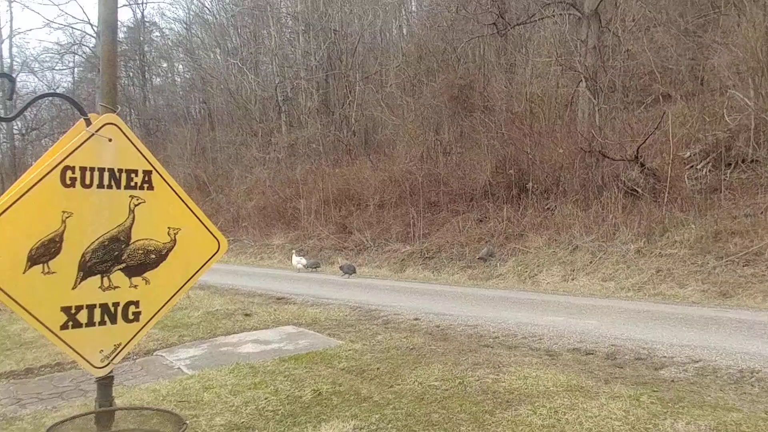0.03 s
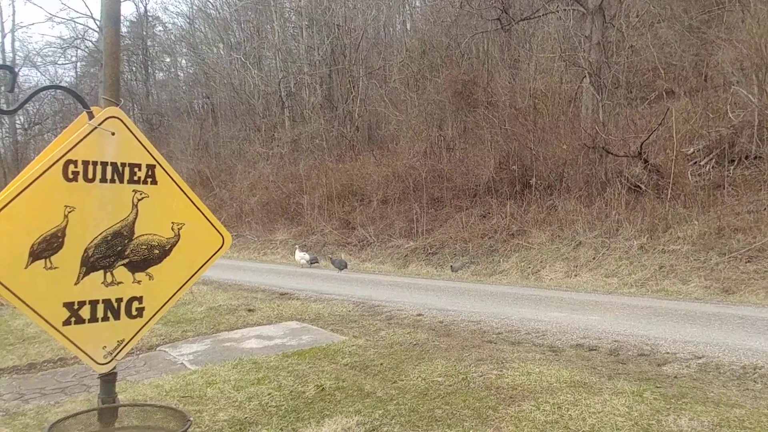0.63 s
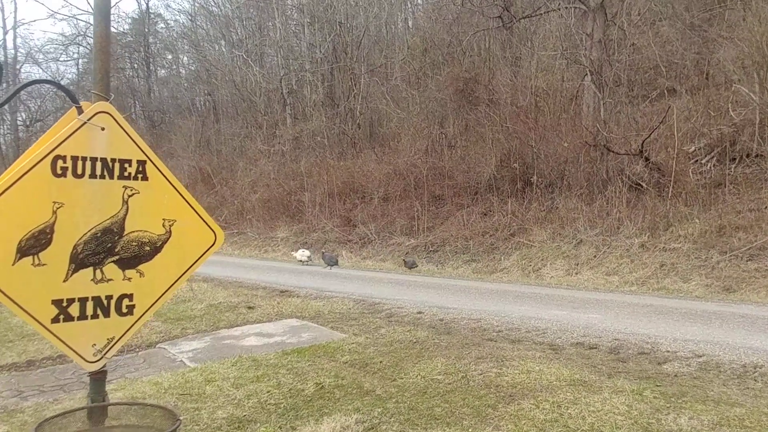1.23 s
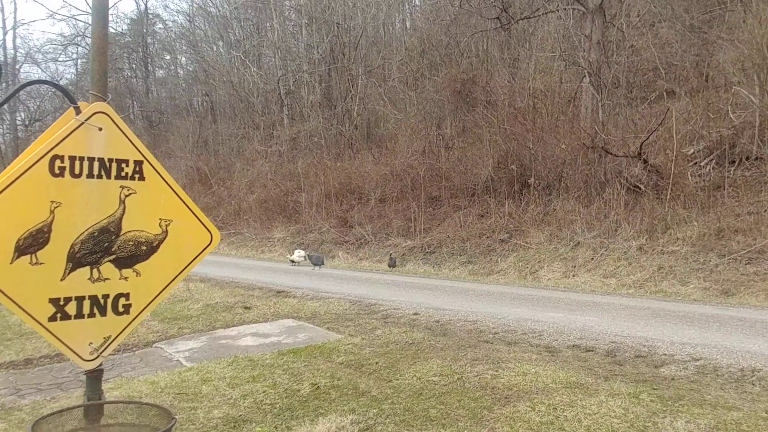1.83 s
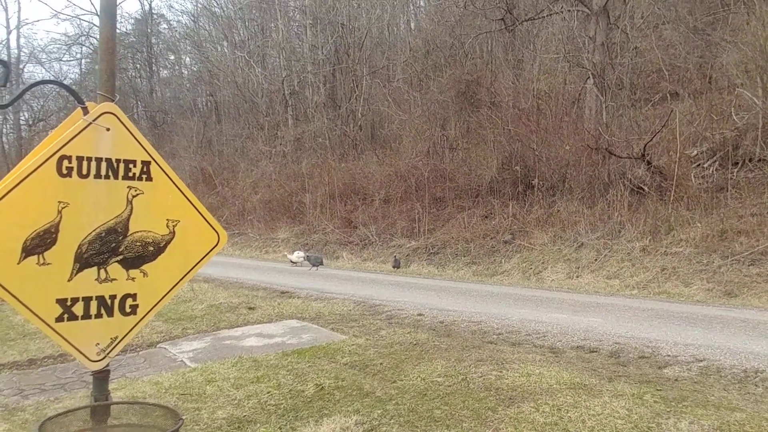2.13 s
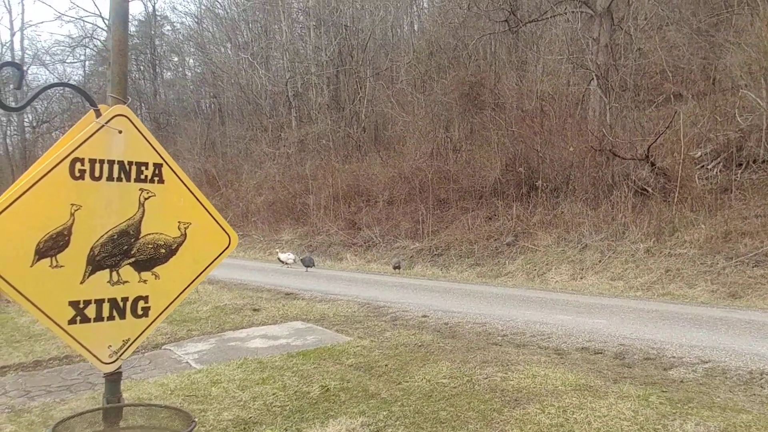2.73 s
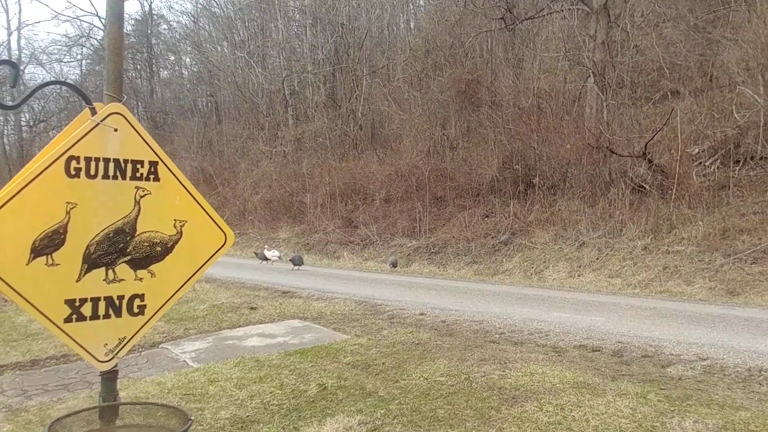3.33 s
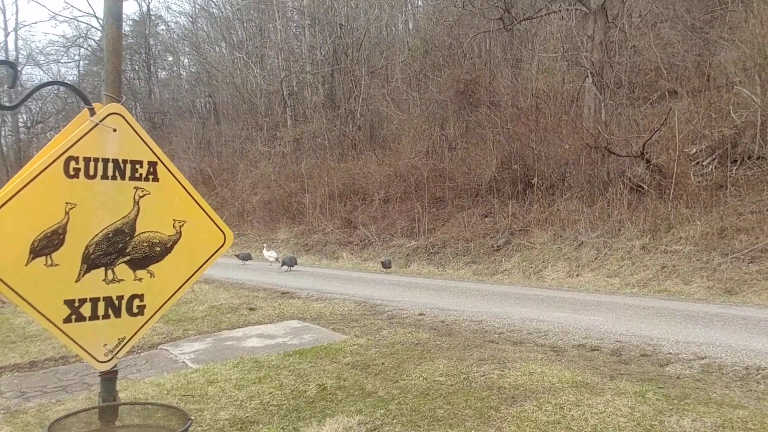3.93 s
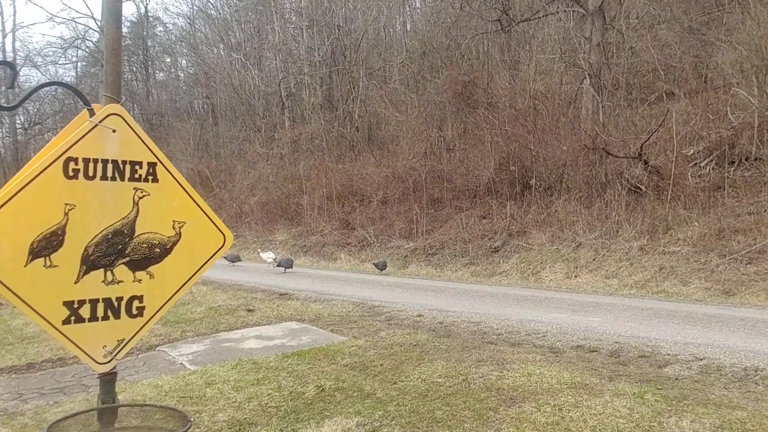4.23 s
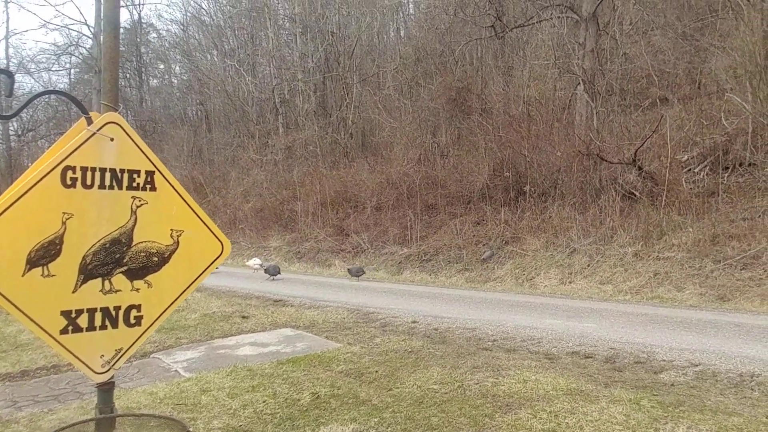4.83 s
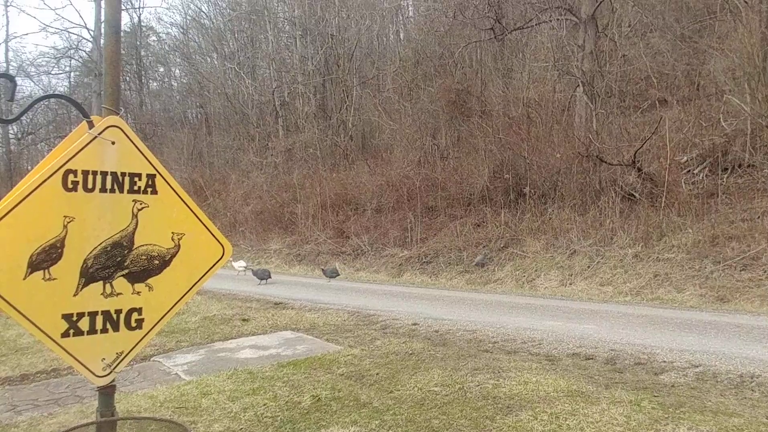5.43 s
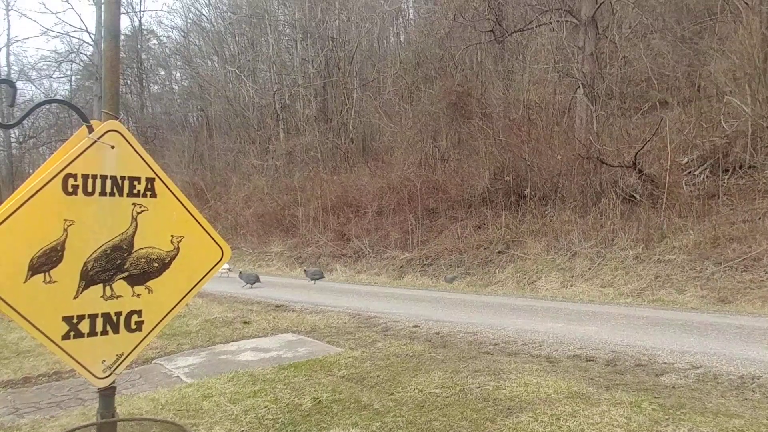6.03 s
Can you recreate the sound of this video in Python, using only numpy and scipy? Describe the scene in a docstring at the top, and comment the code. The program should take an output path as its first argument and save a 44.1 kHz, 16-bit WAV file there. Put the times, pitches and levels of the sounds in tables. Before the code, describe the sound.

Beside a quiet country road, a guinea fowl off to the right keeps up a steady, grating two-part call, each one ringing briefly among the trees. Another of the flock adds a few clipped, high chirps near the start and in the second half. A faint songbird twitters, then later gives a rising whistle. Underneath are low background rumble, slight rustling and occasional light wind touching the microphone.

```python
"""A guinea hen repeats her harsh two-part "buck-wheat" across a country road, and a flock mate
throws in sharp "cheks". Both voices come from a thin skin in the bird's voice box (the syrinx)
that shakes unevenly, making a tone and a rasp. A wooded bank slaps each call back and lets it
ring on. A songbird whistles far off, something rustles faintly, and puffs of wind touch the
microphone over a quiet outdoor rumble."""
import sys
import numpy as np
from scipy import signal
from scipy.fft import rfft, irfft, next_fast_len
from scipy.io import wavfile
from scipy.ndimage import map_coordinates

SR = 44100
rng = np.random.default_rng(int(sys.argv[2]) if len(sys.argv) > 2 else 0)


def unload_wav(signal):
    """Save mono or channel-first audio to the path in sys.argv[1] as 16-bit WAV at rate SR, clipped to [-1, 1]."""
    wavfile.write(
        sys.argv[1],
        SR,
        np.round(np.clip(np.atleast_2d(signal).T, -1, 1) * 32767).astype(np.int16),
    )


N = 268128
TIME = np.arange(N) / SR

# the hen's long "wheat": (time [s], length [s], pitch [Hz], scoop from below [Hz], overshoot [Hz],
# roughness [0-1], tone [dB], rasp [dB], shrill edge [dB], overtones [dB], sizzle [dB])
WHEATS = [ (-0.035, 0.18, 1574, 100.3, 0.5, .6, -33, -43.5, -46, -53, -77),
          (0.623, 0.19, 1568, 120, -0.5, 0.53, -33, -46.5, -45, -46.5, -68),
          (1.302, 0.18, 1639, 220.4, 30, 0.84, -37, -42.5, -43, -49, -68),
          (1.932, 0.18, 1573, 160.1, 60.5, .55, -31.5, -40, -43, -43.5, -56),
          (2.605, 0.18, 1546, 240.4, 10, .45, -30, -43, -48.5, -40.5, -52.5),
          (3.295, .19, 1558, 170.1, 20, 0.53, -30, -42.5, -46, -50, -50.5),
          (3.963, .191, 1501, 189.2, -40, 0.12, -29.5, -44.5, -48, -38.5, -53),
          (4.604, 0.19, 1571, 309.5, 130.5, .55, -30.5, -42.5, -44.5, -41.5, -54),
          (5.183, 0.18, 1568, 120.5, 71, 0.42, -29, -41.5, -43.5, -41.5, -55),
          (5.772, 0.18, 1639, 131.3, -20, .85, -37.5, -42.5, -42.5, -51.5, -72)]
# the overtones of her voice: (multiple of the pitch [x], level [dB])
HEN_HARMONICS = [(2, 11.5), (3, -12.5), (4, -4), (5, -12), (6, -32), (7, -27), (8, -16), (9, -35),
                 (10, -43)]
# how her windpipe, throat and beak shape each part of the "wheat": (frequency [Hz], level [dB])
WINDPIPE_COLOUR = [(820, -33), (950, -8.5), (1150, -8), (1280, -9.5), (1400, -13), (1520, 4), (1700, 5.5),
                   (1830, -6.5), (2200, -40.5)]
RASP_COLOUR = [(600, -30.5), (820, -21.5), (960, -2), (1070, -7.5), (1180, -2), (1320, -22), (1650, 4.5),
               (1900, 10.5), (2100, 1), (2300, 5), (2700, -8), (3100, 4.5), (3500, -49), (5000, -60)]
EDGE_COLOUR = [(1800, -26.5), (2700, 3), (3200, 8.5), (3700, 7.5), (3950, 7), (4400, 3.5), (5200, -5),
               (5800, -17), (6400, -54), (7200, -45), (7900, -35), (9500, -16), (16000, -110)]
SIZZLE_COLOUR = [(4500, -26), (6400, 12), (7200, 1.5), (7900, 1.5), (9000, -16.5), (10400, -27),
                 (11600, 9.5), (12600, -9), (13700, -16), (15500, -4)]
# how each part swells: (full at [share of length], rise [dB/s], held to [share of length], fall [dB/s])
TONE_SWELL = (0.48, 93, 0.74, 305)
RASP_SWELL = (0.58, 266, 0.87, 430)
EDGE_SWELL = (0.69, 274, 1.1, 250)
OVERTONE_SWELL = (0.69, 400, 0.73, 240)
SIZZLE_SWELL = (.54, 280, 0.67, 210)
# rustles and puffs of wind: (time [s], length [s], share spent rising [0-1], level [dB])
RUSTLES = [(0.18, 0.1, 0.02, -50), (0.604, 0.25, 0.48, -52.5), (1.18, 0.32, 0.2, -54.5),
           (1.824, 0.16, 0.24, -53), (2.545, 0.22, 0.53, -48.5), (4.456, 0.14, 0.46, -59.5),
           (4.949, 0.15, 0.29, -49), (5.406, 0.17, 0.14, -56), (5.631, 0.26, 0.03, -59)]
WIND_PUFFS = [(0.26, .14, 0.47, -48), (0.849, .46, 0.45, -48), (1.321, .05, 0.65, -59),
              (4.767, .19, 0.25, -51.5)]
# the mix of lows and highs in the air, rustles and wind: (frequency [Hz], level [dB])
AIR_COLOUR = [(12, -55.5), (20, -8.5), (74, 2.5), (157, -9.5), (266, -6.5), (519, -14.5), (581, -17.5),
              (881, -16), (1100, -22), (1540, -15), (2540, -14), (2840, -27.5), (3350, -20), (4070, -17.5),
              (15500, -28)]
RUSTLE_COLOUR = [(1500, -14.5), (3800, 3.5), (4800, -1.5), (5700, 4.5), (7000, -8), (8000, -3), (9400, -1),
                 (10700, -18), (13000, -9.5), (15500, -11)]
WIND_COLOUR = [(15, -42), (40, -2.5), (65, 1.5), (100, -6), (160, -23.5), (400, -29), (800, -42),
               (2000, -72)]
# the flock mate's "cheks": (time [s], length [s], start pitch [Hz], end pitch [Hz], level [dB],
# roughness [0-1], rasp [dB], in-between tones [dB])
CHEKS = [(0.367, 0.029, 1507, 1752, -46.5, 0.78, 7, 3.5), (0.743, 0.052, 1423, 1478, -31, 0.16, -15.5, -23),
         (1.308, 0.019, 1418, 1466, -39.5, 0.78, -3.5, -7),
         (3.871, 0.064, 1429, 1556, -57.5, 0.75, -12, -2), (4.32, .028, 1345, 1503, -41, 0.18, -21, -10),
         (4.332, 0.024, 1401, 1315, -44.5, .5, 11.5, 6.5), (5.132, 0.026, 1564, 1457, -31.5, 0, -11, -10.5)]
# the tones in the mate's voice: (multiple of the pitch [x], level [dB])
MATE_HARMONICS = [(1, 3.5), (2, 7.5), (3, 1.5), (4, -26)]
# the hen's short "buck": (time [s], length [s], start pitch [Hz], end pitch [Hz], level [dB])
BUCKS = [(0.46, 0.06, 1490, 1223, -45.5), (1.151, 0.064, 1525, 1230, -42), (1.78, 0.059, 1492, 1223, -38.5),
         (2.454, 0.049, 1568, 1224, -37), (3.138, 0.056, 1518, 1222, -42), (3.813, 0.061, 1528, 1221, -39),
         (4.454, .05, 1510, 1224, -38.5), (5.047, 0.059, 1502, 1242, -38.5),
         (5.637, 0.053, 1526, 1239, -44.5)]
# how the throat shapes a "chek" and a "buck": (frequency [Hz], level [dB])
CHEK_COLOUR = [(300, -20.5), (700, -29), (950, -5.5), (1250, -15.5), (2000, -13.5), (2500, -4.5),
               (3000, -1), (3500, 1), (4050, 5), (4700, -13), (5500, -18), (8000, -64), (15000, -27)]
BUCK_COLOUR = [(600, -25.5), (820, -20.5), (950, -1), (1100, -3), (1400, -1), (1650, 6), (2050, -17.5),
               (2300, -9), (2650, -19), (3100, -13), (3500, -21.5), (6000, -33.5), (12000, -42)]
# songbird notes: (time [s], length [s], start pitch [Hz], end pitch [Hz],
# bend [above 1 the slide comes late], level [dB])
SONG_NOTES = [(2.219, 0.036, 4250, 3450, 0.56, -56), (2.236, 0.025, 3240, 2920, 1.04, -49),
              (2.26, 0.03, 2610, 2300, 1.1, -54), (2.3, 0.055, 4020, 3500, 2.1, -62),
              (2.342, .026, 3360, 3060, 1.8, -53.5), (2.362, .027, 2650, 2840, 3, -56.5),
              (2.401, 0.03, 4030, 3700, 3.3, -60.5), (2.429, 0.036, 3450, 3170, 0.65, -53),
              (2.466, 0.033, 3750, 3440, 3.7, -56.5), (2.49, 0.039, 3305, 2980, .7, -50),
              (4.273, 0.097, 3450, 2750, 0.4, -58), (4.477, .44, 3195, 4070, 1.74, -54.5)]
# what the bank and the tree trunks send back: (frequency [Hz], level [dB])
BANK_COLOUR = [(300, 9), (950, -6.5), (1500, -1.5), (2200, 10), (3200, 0.5), (4800, 1), (6500, -1),
               (10000, -7), (15000, -11)]
WOOD_COLOUR = [(300, -8), (1000, 6.5), (1600, 0), (3000, 2.5), (5000, -18.5), (9000, -23), (15000, -46)]
# how the microphone's two sides hear the birds:
# (frequency [Hz], left minus right [dB], left ahead by [radians])
MIC_SIDES = [(500, -4.5, -0.5), (1010, -3.5, 0), (1415, 0.5, 1), (1330, 8, -0.5), (1620, -7.5, -1.87),
             (1990, -6.5, -0.3), (2790, -13.5, -1), (3410, -11, 3), (3720, -2.5, 0.4), (5370, -17, 3),
             (8100, 10.5, 0), (11200, 1.5, -1.95)]


def amp(db):
    """Turn decibels into a number to multiply by."""
    return 10 ** (np.asarray(db) / 20)


def unit(x):
    """Scale a sound to an average strength (rms) of one."""
    return x / np.sqrt(np.mean(x ** 2) + 1e-18)


def colour(x, points, lead=False):
    """Shape lows and highs by (frequency [Hz], level [dB]) points; lead adds (phase [radians])."""
    size = next_fast_len(x.shape[-1] + 4096)
    log_f = np.log(np.fft.rfftfreq(size, 1 / SR) + 1)
    f, *columns = np.transpose(points)
    gain = amp(np.interp(log_f, np.log(f), columns[0]))
    if lead:
        gain = gain * np.exp(1j * np.interp(log_f, np.log(f), columns[1]))
    return irfft(rfft(x, size) * gain, size)[..., :x.shape[-1]]


def wander(rate, size=N):
    """A smooth random wobble, about one in size, with rate new values a second."""
    steps = rng.standard_normal(size // 8 + 8)
    return map_coordinates(steps, [np.arange(size) * rate / SR], order=3, mode="wrap")


def add(track, start, sound):
    """Mix a sound into a track at a time in seconds; it may already be under way at zero."""
    i = int(start * SR)
    sound, i = sound[..., max(-i, 0):], max(i, 0)
    track[..., i:i + sound.shape[-1]] += sound[..., :N - i]


def fade(size, in_s, out_s):
    """Fade in, hold, fade out."""
    t = TIME[:size]
    return np.clip(np.minimum(t / in_s, (t[-1] - t) / out_s), 0, 1)


def swelling(t, length, shape):
    """Loudness that climbs to full, holds and falls away."""
    full, rise_db_per_s, held, fall_db_per_s = shape
    early_s, late_s = np.maximum(full * length - t, 0), np.maximum(t - held * length, 0)
    return amp(-rise_db_per_s * early_s - fall_db_per_s * late_s)


def syrinx(hz, rough, harmonics, pitch_wobble=0.055, level_wobble_db=3):
    """A thin skin shakes unevenly: gives a plain tone, a stack of harmonics and rasping slaps."""
    size = len(hz)
    cycles = np.cumsum(hz * (1 + pitch_wobble * rough * wander(420, size))) / SR
    force = amp(level_wobble_db * rough * wander(260, size))
    tone = np.sin(2 * np.pi * cycles)
    stack = sum(amp(db) * np.sin(2 * np.pi * k * cycles) for k, db in harmonics)
    # one random slap a cycle, leaning to patterns of two and four; a clear voice slaps more evenly
    turn = np.floor(cycles)
    pattern = 0.78 * (1 - rough) + 0.31 * np.cos(np.pi * turn) + 0.64 * np.cos(np.pi * turn / 2)
    slaps = np.diff(turn, prepend=0) * (rng.standard_normal(size) + pattern)
    return unit(force * tone), unit(force * stack), slaps * np.sqrt(force)


def hen_wheats(scoop_s=0.018, overshoot_s=0.045, overshoot_width_s=0.028, sizzle_hz=(11000, 13600)):
    """The hen's long note scoops up to a tone near 1.5 kHz and breaks into an ever brighter rasp."""
    out = np.zeros(N)
    for start, length, pitch_hz, scoop_hz, overshoot_hz, rough, *levels in WHEATS:
        tone_db, rasp_db, edge_db, overtone_db, sizzle_db = levels
        size = int(length * SR)
        t = TIME[:size]
        scoop = scoop_hz * np.exp(-t / scoop_s)
        overshoot = overshoot_hz * np.exp(-((t - overshoot_s) / overshoot_width_s) ** 2)
        hz = pitch_hz - scoop + overshoot
        tone, _, slaps = syrinx(hz, rough, HEN_HARMONICS)
        # uneven slaps ring the windpipe and make the tone grate
        grating = rough * amp(-1) * unit(colour(slaps, WINDPIPE_COLOUR))
        flutter = amp(2 * rough * wander(70, size))
        core = unit(tone + grating) * flutter
        # the other side of the syrinx runs more steadily and carries the overtones
        _, overtones, _ = syrinx(hz, 0.475 * rough, HEN_HARMONICS)
        # as the beak opens, a high sizzle climbs and the rasp rings higher
        climb = 2 * np.pi * np.cumsum(np.linspace(*sizzle_hz, size)) / SR
        sizzle = wander(1500, size) * np.sin(climb) + amp(-4) * unit(colour(slaps, SIZZLE_COLOUR))
        opening = np.cumsum(np.linspace(0.92, 1.06, size))  # read the rasp faster and faster
        rasp = unit(map_coordinates(colour(slaps, RASP_COLOUR), [opening], mode="mirror"))
        # strong and weak cycles take turns, adding a tone halfway to the second harmonic
        halfway, _, _ = syrinx(1.5 * hz, rough / 2, HEN_HARMONICS)
        parts = [(core + amp(-18) * rough * halfway, tone_db, TONE_SWELL),
                 (overtones, overtone_db - 3, OVERTONE_SWELL),
                 ((1 - rough) * overtones, tone_db - 26, TONE_SWELL),
                 (rasp, rasp_db + 1, RASP_SWELL),
                 (unit(colour(slaps, EDGE_COLOUR)), edge_db, EDGE_SWELL),
                 (sizzle, sizzle_db, SIZZLE_SWELL)]
        call = sum(part * amp(db) * swelling(t, length, shape) for part, db, shape in parts)
        add(out, start, fade(size, in_s=0.029, out_s=0.015) * call)
    return out


def outdoor_air(air_db=-66.5, drone_hz=68, drone_db=-75):
    """A quiet rumble, more alike in both ears in the lows, with a far wavering drone."""
    shared, spread = (unit(colour(rng.standard_normal(N), AIR_COLOUR)) for _ in range(2))
    spread = colour(spread, [(60, -5.5), (500, -3.5), (1500, 0), (8000, 0)])
    rumble = np.array([shared + spread, shared - spread])
    hz = drone_hz * (1 + 0.0767 * wander(30))
    drone = unit(np.sin(2 * np.pi * np.cumsum(hz) / SR))
    return amp(air_db + wander(3.37)) * rumble + amp(drone_db + 2.3 * wander(11)) * drone


def rustles(grain_db=3, left_db=1, right_db=-4):
    """Brief soft rustles with a fine grain, nearer the left side."""
    out = np.zeros((2, N))
    for start, length, rise, db in RUSTLES:
        size = int(length * SR)
        swell = np.interp(np.linspace(0, 1, size), [0, rise, 1], [0, 1, 0])
        grains = rng.standard_normal((2, size)) * amp(grain_db * wander(488, size))
        add(out, start, amp(db) * swell * unit(colour(grains, RUSTLE_COLOUR)))
    return out * amp([[left_db], [right_db]])


def wind_puffs(left_db=4, right_db=-6):
    """Swirls of air bump each side of the microphone on its own, the left one more."""
    out = np.zeros((2, N))
    for start, length, rise, db in WIND_PUFFS:
        size = int(length * SR)
        swell = np.interp(np.linspace(0, 1, size), [0, rise, 1], [0, 1, 0])
        swirls = unit(colour(rng.standard_normal((2, size)), WIND_COLOUR))
        add(out, start, amp(db) * swell * swirls)
    return out * amp([[left_db], [right_db]])


def mate_cheks():
    """The flock mate's yelps, clear or cracked, are strongest at twice their pitch."""
    out = np.zeros(N)
    for start, length, from_hz, to_hz, db, rough, rasp_db, between_db in CHEKS:
        progress = np.linspace(0, 1, int(length * SR))
        hz = from_hz + (to_hz - from_hz) * progress
        _, tone, slaps = syrinx(hz, rough, MATE_HARMONICS)
        rasp = amp(rasp_db) * unit(colour(slaps, CHEK_COLOUR))
        # every third cycle is stronger, which puts extra tones between the harmonics
        thirds = np.cos(2 * np.pi * np.cumsum(hz / 3) / SR)
        between = amp(between_db) * unit(colour(tone * thirds, CHEK_COLOUR))
        swell = np.abs(np.sin(np.pi * progress)) ** 0.84
        add(out, start, amp(db) * swell * (tone + rasp + between))
    return out


def hen_bucks(clearing=0.66, tone_db=-3.5, rasp_db=-3, rise_share=0.66, fall_share=0.1):
    """The hen's short note: a hoarse cluck that clears as its pitch falls, then stops short."""
    out = np.zeros(N)
    for start, length, from_hz, to_hz, db in BUCKS:
        progress = np.linspace(0, 1, int(length * SR))
        hz = from_hz + (to_hz - from_hz) * progress
        hoarse = 1 - clearing * progress
        tone, _, slaps = syrinx(hz, 0.9 * hoarse, HEN_HARMONICS)
        rasp = hoarse * amp(rasp_db) * unit(colour(slaps, BUCK_COLOUR))
        swell = np.clip(np.minimum(progress / rise_share, (1 - progress) / fall_share), 0, 1)
        add(out, start, amp(db) * swell * (amp(tone_db) * tone + rasp))
    return out


def songbird(waver=0.0069, flutter_db=2, song_db=-3.5, fade_s=0.0053):
    """Thin sliding whistles from the trees, each one a single wavering tone."""
    out = np.zeros(N)
    for start, length, from_hz, to_hz, bend, db in SONG_NOTES:
        size = int(length * SR)
        hz = from_hz + (to_hz - from_hz) * np.linspace(0, 1, size) ** bend
        phase = 2 * np.pi * np.cumsum(hz * (1 + waver * wander(250, size))) / SR
        loudness = amp(db + song_db + flutter_db * wander(116.3, size))
        add(out, start, fade(size, fade_s, fade_s) * loudness * unit(np.sin(phase)))
    return out


def bank_echo(x, bank_db, wood_db, patterns, ground_db=-10, brush_db=-16, bank_s=0.034, smear_s=0.0154):
    """Rough ground scatters at once, the bank slaps back, brush and trunks add a short and long tail."""
    t = TIME[:SR // 2]
    build_up = np.clip(t / bank_s - 1 / 2, 0, 1)
    tails = [build_up * amp(-60 * t / ring_s) for ring_s in (0.33, 0.95)]
    shapes = [np.exp(-t / 0.0045), np.exp(-((t - bank_s) / smear_s) ** 2), *tails]
    out = np.zeros((2, N))
    # the birds move about, so the echo fades from one random pattern to the next
    for k in range(patterns):
        share = np.clip(1 - np.abs(np.linspace(0, patterns - 1, N) - k), 0, 1)
        active = np.flatnonzero(share)
        bursts = (rng.standard_normal((2, len(t))) * shape for shape in shapes)
        ground, slap, brush, wood = (unit(burst) / np.sqrt(len(t)) for burst in bursts)
        bank = colour(amp(bank_db) * slap + amp(brush_db) * brush, BANK_COLOUR)
        echo = amp(ground_db) * ground + bank + colour(amp(wood_db) * wood, WOOD_COLOUR)
        calls = (x * np.sqrt(share))[None, active]
        add(out, TIME[active[0]], signal.fftconvolve(calls, echo, axes=1))
    return out


def scene():
    """The birds are to the right; their calls and echoes join the rustles, wind and air."""
    fowl, song = hen_wheats() + hen_bucks() + mate_cheks(), songbird()
    fowl_echo = bank_echo(fowl, bank_db=-3.5, wood_db=-24.5, patterns=8)
    song_echo = bank_echo(song, bank_db=-8.5, wood_db=-4, patterns=2)
    left, right = fowl + song + fowl_echo + song_echo
    hz, balance_db, lead = np.transpose(MIC_SIDES)
    left = colour(left, np.transpose([hz, balance_db / 2, lead / 2]), lead=True)
    right = colour(right, np.transpose([hz, -balance_db / 2, -lead / 2]), lead=True)
    return np.array([left, right]) + rustles() + wind_puffs() + outdoor_air()


def record(dry, low_cut_hz=41, high_cut_hz=15650):
    """The recorder thins the deepest bass and cuts the highest treble."""
    thinned = signal.sosfilt(signal.butter(4, low_cut_hz, "high", fs=SR, output="sos"), dry)
    return signal.sosfilt(signal.ellip(10, 0.2, 70, high_cut_hz, fs=SR, output="sos"), thinned)


dry = scene()
out = record(dry)
unload_wav(out)
```